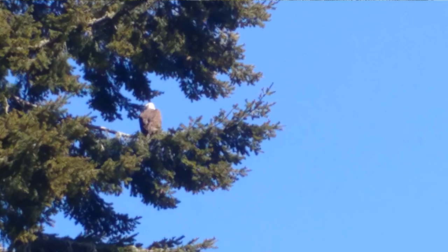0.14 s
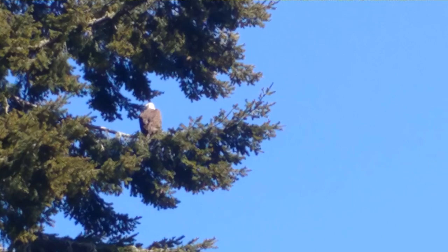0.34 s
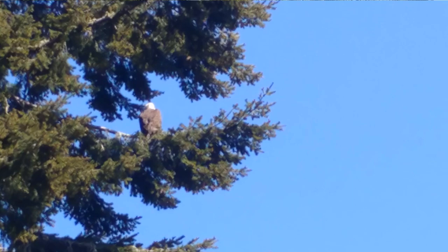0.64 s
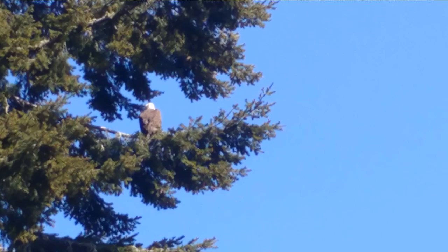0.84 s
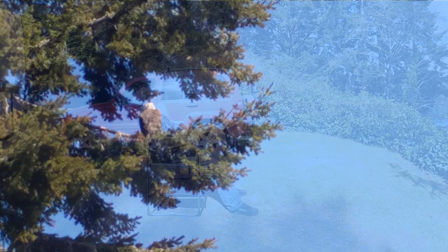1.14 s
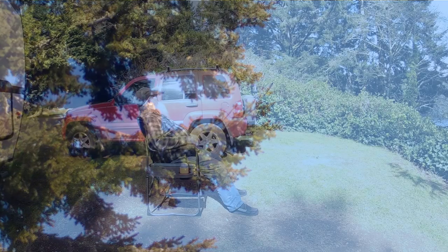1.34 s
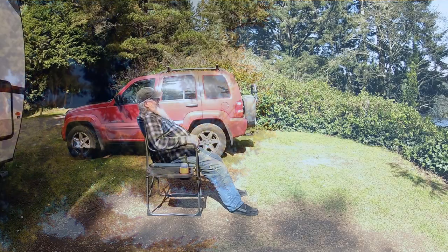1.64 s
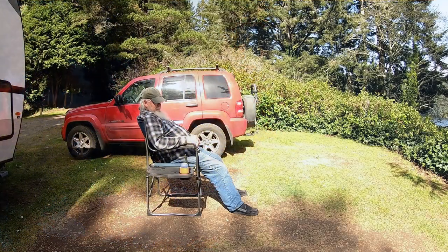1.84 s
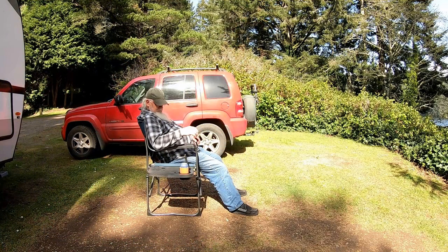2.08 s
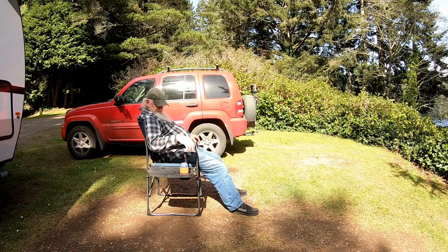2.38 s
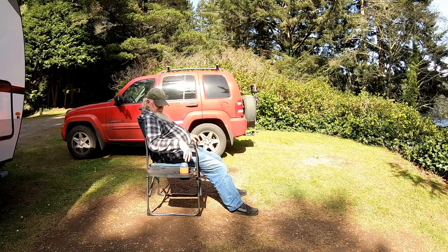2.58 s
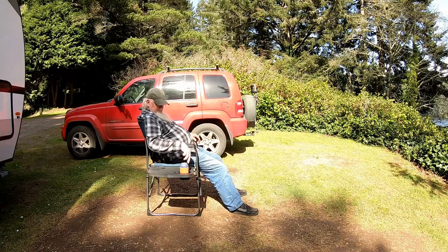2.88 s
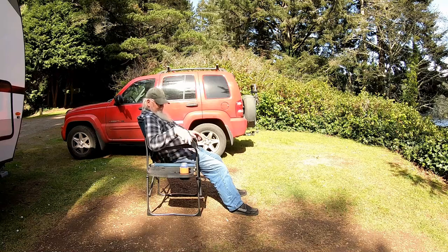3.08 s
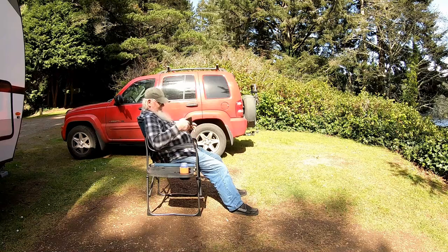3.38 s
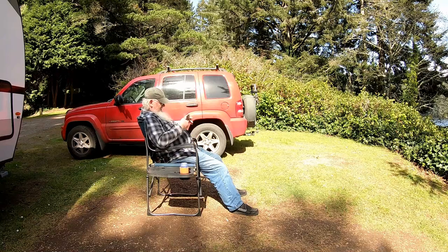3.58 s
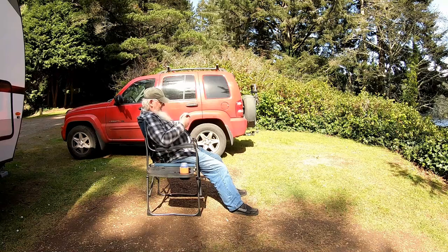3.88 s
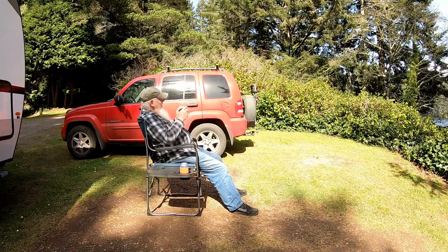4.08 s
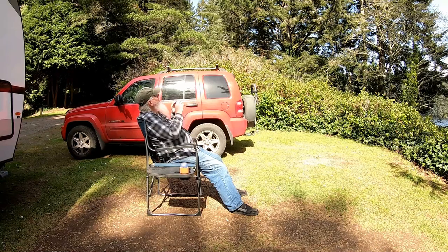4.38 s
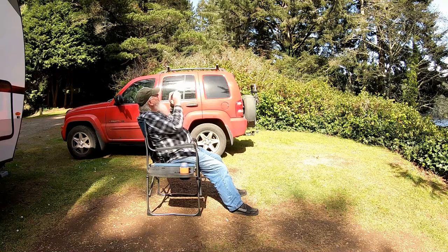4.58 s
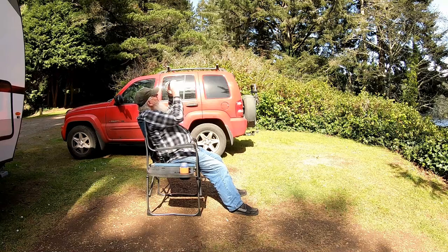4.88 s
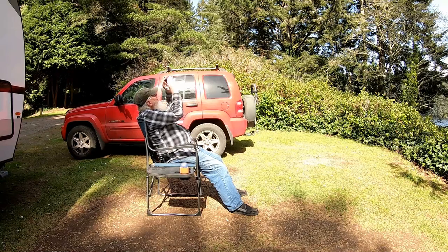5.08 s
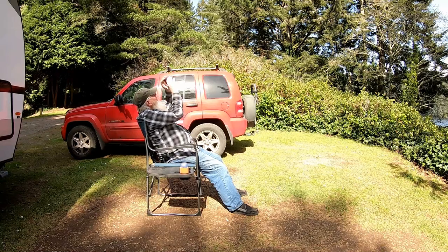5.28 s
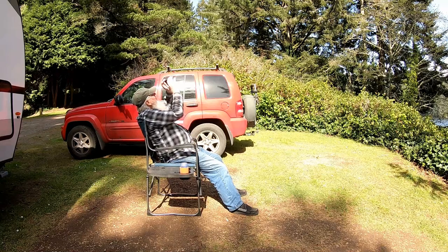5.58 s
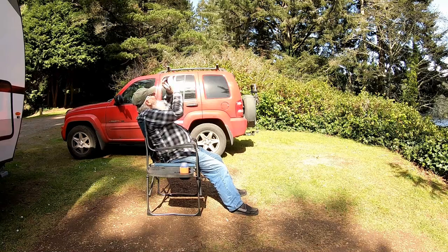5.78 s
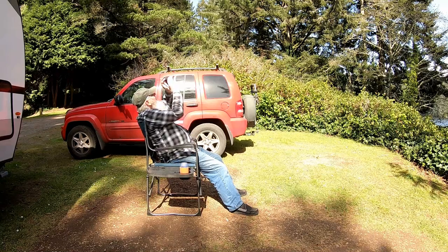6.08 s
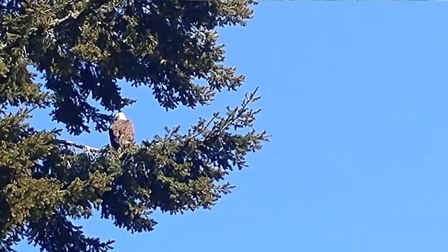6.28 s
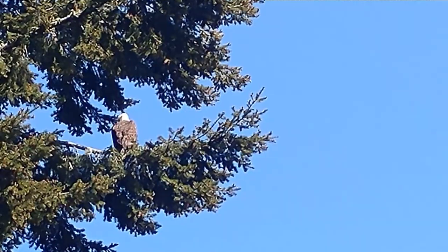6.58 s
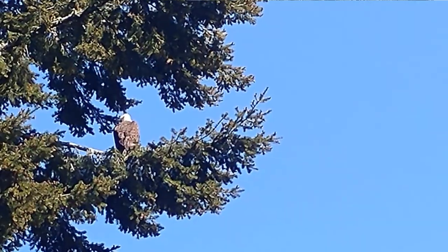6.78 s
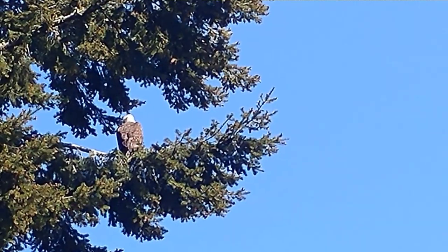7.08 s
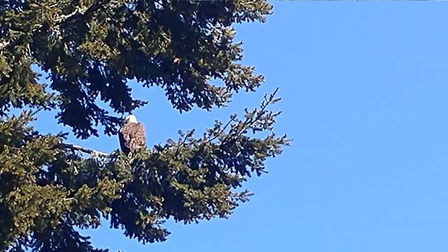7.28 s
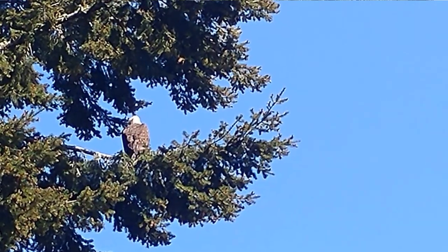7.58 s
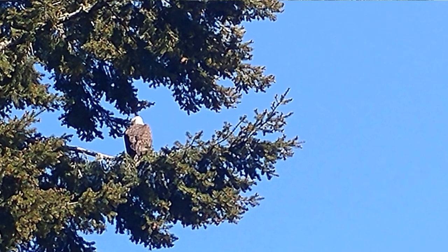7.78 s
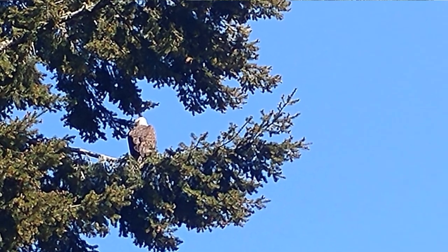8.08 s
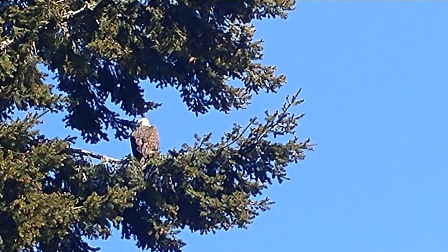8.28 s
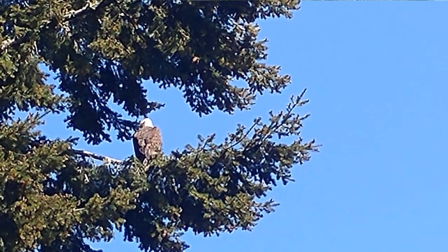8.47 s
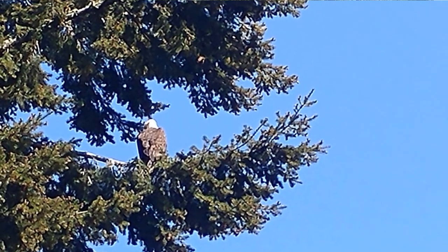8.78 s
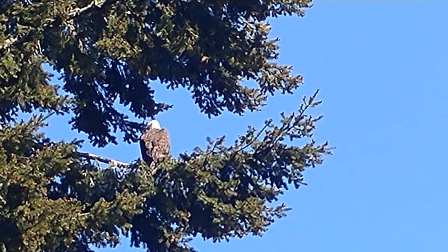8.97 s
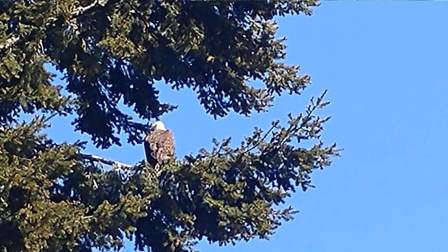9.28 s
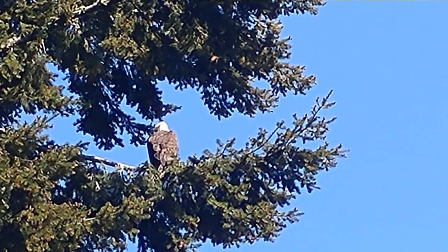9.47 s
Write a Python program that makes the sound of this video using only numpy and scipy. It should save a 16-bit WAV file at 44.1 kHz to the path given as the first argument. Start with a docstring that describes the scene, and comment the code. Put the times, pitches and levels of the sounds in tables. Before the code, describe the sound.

Outdoors among echoing firs, an eagle's quick high piping descends and stops; over soft distant rush, sharp yelp-and-pip calls follow near the end.

```python
"""By a lake, a bald eagle in a fir gives a falling run of piping notes, later yelps answered by pips.
Its notes are gliding sine tones with overtones, roughened by noise; noise bands make its breath.
Wheezy whistles are narrow noise bands, a small bird is swept sines, small clicks are ringing noise.
Trees throw the calls back as scattered echoes; behind lie a distant, slowly growing rush, a drone,
a gusty low rumble of air and a faint high hiss, all coloured noise."""
import sys
import numpy as np
from scipy import signal
from scipy.io import wavfile
from scipy.ndimage import uniform_filter1d

SR = 44100
rng = np.random.default_rng(int(sys.argv[2]) if len(sys.argv) > 2 else 0)


def inscribe(sig):
    """Save sig as 16-bit PCM at rate SR to the path in sys.argv[1].

    A 1-D sig is mono; a 2-D sig holds one channel per row.
    Samples are clipped to [-1, 1] before scaling.
    """
    pcm = np.round(np.clip(np.atleast_2d(sig).T, -1, 1) * 32767)
    wavfile.write(sys.argv[1], SR, pcm.astype(np.int16))


N = 425124  # length in samples

# Eagle tables: overtone levels are relative to the fundamental.
# the piping run: t/s, length/s, pitch f/Hz, level/dB, 2nd harmonic level/dB, 3rd harmonic level/dB,
# scoop up to the pitch [share of pitch], fade [share of length], roughness [0-1]
PIPES = [ (0.288, 0.099, 2712, -15.5, -24, -33, 0.06, 0.78, 0.08),
         (0.404, 0.07, 2791, -14.5, -22.5, -33, 0.03, 0.82, 0.26),
         (0.501, 0.054, 2768, -16.3, -21, -33, 0.04, 0.47, 0.18),
         (0.616, 0.046, 2715, -16, -20, -31, .1, 0.2, .15),
         (0.744, 0.051, 2704, -15, -20.5, -30.5, .09, 0.53, 0),
         (0.872, .043, 2643, -15.5, -20.5, -28.5, .08, 0.9, 0.06),
         (1, 0.047, 2596, -20, -20, -38, 0.09, 0.7, 0.28),
         (1.341, .033, 2398, -28.5, -29.5, -35, 0, 0.2, 0.54)]
# yelps: t/s, time stretch [1 = usual], level/dB, low stage level/dB, high stage level/dB
# (both stages relative to the middle one)
YELPS = [(8.112, 1.13, -25, -16, -33), (8.569, 1.08, -20.5, -7, -5.5), (9.024, .92, -20.5, -2, 1.5),
         (9.446, 1.09, -19, -3.5, -1)]
# pips after yelps: t/s, length/s, pitch f/Hz, level/dB, 2nd harmonic level/dB, preceding wheeze level/dB
PIPS = [(8.273, 0.019, 3057, -20, -25, -61.5), (8.711, .020, 3056, -17, -27.5, -57.5),
        (9.138, .016, 3057, -17.5, -32, -47.5)]
# hoarse falls that end calls: t/s, length/s, start f/Hz, end f/Hz, level/dB, roughness [0-1]
FALLS = [(0.542, 0.019, 2156, 1950, -39.5, .4), (8.293, 0.018, 3110, 2980, -27, 0.42),
         (8.729, 0.024, 2735, 1910, -30, 0.76), (9.154, .040, 3073, 1740, -34.5, 0.9),
         (9.523, 0.068, 2550, 1410, -35.5, 0.9)]
# a pipe tops out at this share of its length; the longer it is, the lower it ends
PIPE_PEAK, SAG_HZ_PER_S = 0.33, 3600


def gain_of(db):
    """Level to amplitude: 20 dB is a factor of ten."""
    return 10 ** (np.asarray(db) / 20)


def evened(x):
    """Power normalisation: scales to rms 1."""
    return x / np.sqrt(np.mean(x ** 2) + 1e-20)


def read(points, hz):
    """Interpolation on a logarithmic frequency axis."""
    f, value = np.transpose(points)
    return np.interp(np.log(hz + 1), np.log(f + 1), value)


def curve(rows):
    """Linear interpolation of a time table at every sample."""
    t, value = np.transpose(rows)
    return np.interp(np.arange(N) / SR, t, value)


def add(mix, s, sound):
    """Superposition: adds a sound into the mix from time s."""
    part = mix[max(round(s * SR), 0):][:len(sound)]
    part += sound[:len(part)]


def flutter(n, width_hz):
    """Band-limited complex noise of about rms 1; the bandwidth sets how fast it changes."""
    z = rng.standard_normal((SR // 2, 2)) @ [1, 1j]
    lowpass = signal.butter(3, width_hz / 2, fs=SR, output="sos")
    slow = signal.sosfilt(lowpass, z)
    unit = evened(slow.view(float)).view(complex) / np.sqrt(2)
    return unit[-n:]  # the end, where the filter has settled


def arch(u, start, top, end, place, bend=1.7):
    """Frequency glide along a power law: eases into its top and leaves it again."""
    place = np.clip(place, 0.05, 0.95)
    before = (start - top) * abs(1 - u / place) ** bend
    after = (end - top) * abs((u - place) / (1 - place)) ** bend
    return top + np.where(u < place, before, after)


def swell(u, rise, fade):
    """Amplitude envelope: rounded rise and fade, each a share of the length."""
    rise, fade = np.clip([rise, fade], 0.03, 0.9)
    opening = np.sin(np.pi / 2 * np.clip(u / rise, 0, 1))
    closing = np.sin(np.pi / 2 * np.clip((1 - u) / fade, 0, 1))
    return (opening * closing) ** 1.4


def hiss(length, start, top, end, place, width, db, rise=0.3, fade=0.23):
    """Heterodyning: slow complex noise on a gliding carrier is a narrow moving band of hiss."""
    u = np.linspace(0, 1, round(length * SR))
    carrier = np.exp(2j * np.pi * np.cumsum(arch(u, start, top, end, place)) / SR)
    band = (carrier * flutter(len(u), width)).real
    return gain_of(db) * evened(band) * swell(u, rise, fade)


def note(length, start, top, end, place, fade, db, second_db, third_db, rough,
         rise=0.0039, shimmer=0.56, catch=1.0, hump=0.062, grit=0.29):
    """Self-oscillation: the syrinx catches roughly, then whistles; returns fundamental and overtones."""
    # partials from the 3rd harmonic's neighbourhood up: multiple of the pitch, level/dB added to the 3rd's
    partials = [(2.5, -17.5), (3, 0.5), (3.5, -22.5), (4, -28), (4.5, -24), (5, -28)]
    t = np.arange(round(length * SR)) / SR
    u = t / length
    unrest = (rough + catch * np.exp(-t / 0.003)) * flutter(len(t), 600)
    pitch = arch(u, start, top, end, place) * (1 + 0.04 * unrest.real)
    phase = 2 * np.pi * np.cumsum(pitch) / SR
    force = swell(u, rise / length, max(fade, 0.3)) * (1 - hump * np.cos(np.pi * u ** 0.75) ** 2)
    upper = sum(gain_of(level) * np.sin(round(2 * k) / 2 * phase) for k, level in partials)
    # the overtones are grittier than the fundamental, and the upper ones weaken faster with force
    overtones = gain_of(second_db) * np.sin(2 * phase) + force ** 2 * gain_of(third_db) * upper
    overtones = overtones * (1 + grit * flutter(len(t), 600).real)
    envelope = np.sqrt(2) * gain_of(db) * force * (1 + shimmer * unrest.imag)
    return envelope * np.array([np.sin(phase), overtones])


def pipes():
    """Frequency modulation: each pipe scoops up and sags; lower ones start with a crack at a lower pitch."""
    crack_below_hz, crack_hz, crack_scoop = 2710, 1958, 0.059  # scoop as a share of the pitch
    crack_s, crack_lead_s, crack_db = 0.012, 0.0033, -29.5
    for s, length, hz, db, second_db, third_db, scoop, fade, rough in PIPES:
        end = hz - SAG_HZ_PER_S * length
        yield s, note(length, hz * (1 - scoop), hz, end, PIPE_PEAK, fade, db, second_db, third_db, rough)
        if hz < crack_below_hz:
            crack = note(crack_s, crack_hz * (1 - crack_scoop), crack_hz, crack_hz, place=0.65, fade=1.0,
                         db=crack_db, second_db=-29, third_db=-37, rough=0.33)
            yield s - crack_lead_s, crack


def yelps():
    """Fast upward glide: each yelp sweeps up, built from three overlapping stages (low, middle, high)."""
    # stages, low to high: delay t/s, length/s (both before the stretch), pitch f/Hz,
    # glide either side [share of pitch], 2nd harmonic level/dB, 3rd harmonic level/dB
    stages = [(0, 0.019, 1509, 0.09, -10.5, -28), (.005, .020, 1878, 0.08, -22, -41.5),
              (.013, .025, 2500, .06, -33.5, -49.5)]
    for s, stretch, db, low_db, high_db in YELPS:
        for stage, stage_db in zip(stages, (low_db, 0, high_db)):
            delay, length, hz, glide, second_db, third_db = stage
            yield s + delay * stretch, note(length * stretch, hz * (1 - glide), hz, hz * (1 + glide), 0.41,
                                            0.52, db + stage_db, second_db, third_db, rough=0.28)


def pips():
    """Near-pure tones: short high notes that droop a little."""
    droop = 0.018  # share of the pitch, either side
    for s, length, hz, db, second_db, _ in PIPS:
        yield s, note(length, hz * (1 + droop), hz, hz * (1 - droop), 0.46, 0.23, db, second_db,
                      third_db=-54.5, rough=0.19, rise=0.0058)


def falls():
    """Relaxing oscillation: the voice holds briefly, then slides down hoarsely."""
    for s, length, start, end, db, rough in FALLS:
        yield s, note(length, start, start, end, 0.37, 0.67, db, second_db=-27, third_db=-47.5, rough=rough)


def eagle():
    """Source separation: fundamentals with the breath of the falls, and overtones with other hiss."""
    whistle, overtones = np.zeros((2, N))
    for s, (low, high) in [*pipes(), *yelps(), *pips(), *falls()]:
        add(whistle, s, low)
        add(overtones, s, high)
    # a grainy band around each pipe's 2nd harmonic
    for s, length, hz, db, *_ in PIPES:
        end = hz - SAG_HZ_PER_S * length
        add(overtones, s, hiss(length, 2 * end, 2 * hz, 2 * end, PIPE_PEAK, width=320, db=db - 36.5))
    # air that escapes with a yelp
    air_hz = 2286
    for s, _, db, *_ in YELPS:
        add(overtones, s, hiss(0.035, air_hz, air_hz, air_hz, 0.5, width=1400, db=db - 23))
    # the breathy part of a fall
    for s, length, start, end, db, _ in FALLS:
        add(whistle, s, hiss(length, start, start, end, 0.51, width=680, db=db - 4))
    return whistle, overtones


def wheezes():
    """Band-limited noise: a short falling wheeze just before each pip and each pipe but the first."""
    # a pipe's wheeze follows its pitch steeply: pipe_wheeze_hz before a pipe of reference_hz
    reference_hz, pipe_wheeze_hz, power = 2730, 5200, 6.6
    pipe_lead_s, pipe_under_db = 0.012, -34.5
    pip_lead_s, pip_wheeze_hz = 0.016, 5640
    length_s, fall, width_hz = 0.017, 0.048, 1100  # fall: share of the pitch, either side
    starts = []
    for s, _, hz, db, *_ in PIPES[1:]:
        wheeze_hz = pipe_wheeze_hz * (hz / reference_hz) ** power
        starts.append((s - pipe_lead_s, wheeze_hz, db + pipe_under_db))
    for s, *_, db in PIPS:
        starts.append((s - pip_lead_s, pip_wheeze_hz, db))
    out = np.zeros(N)
    for s, hz, db in starts:
        add(out, s, hiss(length_s, hz * (1 + fall), hz, hz * (1 - fall), 0.3, width_hz, db))
    return out


def whistles():
    """Interaural level difference: airy whistles, mostly to the right, and falling rasps by the first two."""
    # thin whistles: t/s, length/s, start f/Hz, top f/Hz, end f/Hz, level/dB, left minus right level/dB
    airy = [(5.586, 0.2, 3650, 6790, 6980, -55.5, -11), (5.846, 0.098, 3700, 6020, 4600, -51, -13.5),
            (8.658, .016, 4300, 5825, 5950, -55, 1)]
    # low rasps: t/s, length/s, start pitch f/Hz, level/dB, 2nd harmonic level/dB (relative)
    rasps = [(5.717, 0.063, 2460, -56, 3), (5.896, 0.056, 2595, -53, -8), (6.039, .056, 2655, -57.5, -25)]
    rasp_fall, rasp_width_hz, rasp_pan_db, fourth_db = 0.2, 560, -6, -18  # fourth: beside the 2nd harmonic
    air_hz, air_width_hz, air_db = 4000, 3300, -3  # broad hiss around each rasp
    sounds = []
    for s, length, start, top, end, db, pan_db in airy:
        sounds.append((s, pan_db, hiss(length, start, top, end, 0.59, 830, db)))
    for s, length, hz, db, second_db in rasps:
        for k, part_db in ((1, 0), (2, second_db), (4, second_db + fourth_db)):
            part = hiss(length, k * hz, k * hz, k * hz * (1 - rasp_fall), 0.38,
                        rasp_width_hz * np.sqrt(k), db + part_db)
            sounds.append((s, rasp_pan_db, part))
        rasp_air = hiss(length, air_hz, air_hz, air_hz * (1 - rasp_fall), 0.45, air_width_hz, db + air_db)
        sounds.append((s, rasp_pan_db, rasp_air))
    left, right = np.zeros((2, N))
    for s, pan_db, sound in sounds:
        add(left, s, gain_of(pan_db / 2) * sound)
        add(right, s, gain_of(-pan_db / 2) * sound)
    return np.array([left, right])


def small_bird():
    """Linear chirps: a small bird's quick, clean downward sweeps."""
    # falling ticks: t/s, length/s, start f/Hz, end f/Hz, peak level/dB
    ticks = [(0.118, 0.026, 6300, 5200, -67), (1.187, 0.011, 5200, 3900, -58),
             (1.21, .010, 4950, 3800, -60), (1.22, 0.0058, 4900, 3580, -51), (7.651, .016, 7600, 5850, -66),
             (7.697, 0.035, 8400, 6200, -66)]
    out = np.zeros(N)
    for s, length, start, end, db in ticks:
        u = np.linspace(0, 1, round(length * SR))
        phase = 2 * np.pi * np.cumsum(start + (end - start) * u) / SR
        add(out, s, gain_of(db) * np.sin(np.pi * u) * np.sin(phase))
    return out


def clicks(snap=4, after_db=-21, after_t60=0.33):
    """Impulse response: a snap and crackle ring a dull body and die away; most keep only treble. At 7.33 s a
    longer burst of high hiss sounds as well."""
    # small clicks; at 7.33 s a longer burst of high hiss:
    # t/s, level/dB (rms of the first 10 ms), 60 dB decay/s, low edge f/Hz
    click_table = [(1.991, -51, 0.012, 3430), (2.106, -63.5, 0.013, 3500), (2.891, -68, 0.011, 4000),
                   (3.208, -33, 0.036, 203), (3.464, -74, 0.014, 6000), (5.426, -58, .02, 3500),
                   (6.265, -56, 0.0056, 2940), (7.331, -63, .18, 5900)]
    # body resonance: f/Hz, level/dB
    colour = [(100, 1), (400, 7), (700, 8), (1100, -6.5), (1550, 17.5), (1850, -1), (2150, 8), (2900, -3),
              (3400, -5.5), (5200, -4), (7500, -18.5), (11200, -20), (12200, -55)]
    out, t = np.zeros(N), np.arange(SR // 4) / SR
    log_gain = np.log(gain_of(read(colour, abs(np.fft.fftfreq(len(t), 1 / SR)))))
    # minimum phase: the body rings only after it is struck
    body = np.fft.ifft(np.exp(signal.hilbert(log_gain).conj())).real
    for s, db, t60, low_hz in click_table:
        decay = gain_of(-60 * t / t60) + gain_of(after_db - 60 * t / after_t60)
        strike = snap * (t == 0) + rng.standard_normal(len(t)) * decay
        ringing = signal.fftconvolve(strike, body)[:len(t)]
        crack = signal.sosfilt(signal.butter(2, low_hz, "high", fs=SR, output="sos"), ringing)
        add(out, s, gain_of(db) * crack / np.sqrt(np.mean(crack[:SR // 100] ** 2)))
    return out


def woods(x, near_db=-15, near_t60=0.083, far_db=-14, first=0.012, build=0.013, likeness=0.99, treble_db=3):
    """Multiple scattering: near trunks give a short echo, far trees a longer tail that builds up."""
    # 60 dB decay of the far trees: f/Hz, decay/s
    far_t60 = [(500, 0.94), (2700, 0.56), (5500, 0.31), (8000, 0.34), (14000, 0.087)]
    t = np.arange(SR) / SR
    # sparse random reflections, about 2500 per second, from `first` seconds on
    taps = rng.standard_normal((2, SR)) * (rng.random(SR) < 2500 / SR) * (t > first)
    likeness = np.clip(likeness, 0, 1)
    taps[1] = likeness * taps[0] + np.sqrt(1 - likeness ** 2) * taps[1]
    near = taps * gain_of(-60 * t / near_t60)
    # reversing the taps gives the far trees a different pattern
    building = taps[:, ::-1] * np.clip((t - first) / build, 0, 1)
    hz, when, z = signal.stft(building, SR, nperseg=256)
    treble_lift = treble_db * np.clip(hz / 2700 - 1, 0, 1)[:, None]
    z = z * gain_of(treble_lift - 60 * when / read(far_t60, hz)[:, None])
    far = signal.istft(z, SR, nperseg=256)[1][:, :SR]
    near_echo = gain_of(near_db) * near / np.linalg.norm(near[0])
    far_echo = gain_of(far_db) * far / np.linalg.norm(far[0])
    return signal.fftconvolve(x[None], near_echo + far_echo, axes=1)[:, :N]


def bump():
    """Narrow-band noise: a brief, dull puff of low sound."""
    # t/s, length/s, centre f/Hz, bandwidth f/Hz, level/dB
    puff = (3.74, .11, 250, 150, -50)
    s, length, hz, width, db = puff
    out, t = np.zeros(N), np.arange(round(length * SR)) / SR
    band = (np.exp(2j * np.pi * hz * t) * flutter(len(t), width)).real
    add(out, s, gain_of(db) * evened(band) * swell(t / length, 0.31, 0.61))
    return out


def air(spectrum, patchy_db):
    """Partial coherence: coloured two-channel noise of rms 1 with slowly drifting patches."""
    # left-right likeness: f/Hz, correlation [-1 to 1]
    same_table = [(60, 1), (110, 0.97), (200, 0.96), (380, 0.91), (700, 0.62), (1290, 0.47), (2380, 0.48),
                  (4400, 0.53), (8120, -0.27), (15000, -0.17)]
    # balance: f/Hz, left minus right level/dB
    lean_table = [(60, 2), (130, -0.5), (290, 1.5), (640, -0.5), (1410, -2.5), (3100, 0.5), (6820, -5.5),
                  (15000, -2)]
    hz = np.fft.rfftfreq(4096, 1 / SR)
    a, b, c, d, patches = rng.standard_normal((N // 1024 + 5, len(hz), 5)).T
    patches = uniform_filter1d(patches, size=30, axis=0)  # over frequency
    patches = evened(uniform_filter1d(patches, size=5, axis=1))  # over time
    same = np.clip(read(same_table, hz), -1, 1)[:, None]
    lean = gain_of(read(lean_table, hz) / 2)[:, None]
    left = a + 1j * b
    right = same * left + np.sqrt(1 - same ** 2) * (c + 1j * d)
    z = np.array([left * lean, right / lean])
    z *= gain_of(read(spectrum, hz)[:, None] + patchy_db * patches)
    return evened(signal.istft(z, nperseg=4096, noverlap=3072)[1][:, :N])


def outdoors():
    """Incoherent sum: a distant rush, a low drone, a gusty rumble and a faint high hiss."""
    # spectra: f/Hz, relative level/dB per Hz
    rush_colour, drone_colour = [(150, -37.5), (250, -8), (297, -9), (324, -8.5), (420, -10.5), (624, -5.5),
                                 (729, -0.5), (944, 1), (2400, -18), (3820, -32), (5780, -34.5),
                                 (7750, -44), (9530, -40), (11900, -62.5), (15400, -64.5)], [(20, -28.5), (90, -17.5), (130, -6), (160, 2.5), (178, -4.5),
                                               (198, 5.5), (220, -3.5), (300, -14), (450, -26.5),
                                               (900, -74.5)]
    rumble_colour, fizz_colour = [(10, -7.5), (30, -6.5), (55, -0.5), (95, 2), (125, -1.5), (200, -20),
                                  (500, -64.5)], [(1500, -18.5), (3400, 4), (4500, -8.5), (7000, -7),
                                                  (10000, -14.5), (15000, -21)]
    # levels over time: t/s, level/dB (the rumble's without gusts)
    rumble_level, drone_level, fizz_level = [(0, -55), (1.85, -54.5), (2, -68), (5, -67.5), (5.6, -58.5),
                                             (6.85, -66), (7.6, -52.5), (9.64, -55)], [(0, -58), (2, -57), (5.8, -58), (6.3, -57),
                                                                (8, -54), (9.64, -58)], [(0, -71.5), (1, -69.5),
                                                                                     (1.9, -87),
                                                                                     (7.2, -108),
                                                                                     (7.4, -74.5),
                                                                                     (9.64, -76)]
    # soft gusts that lift the rumble: centre t/s, peak level/dB
    gust_table = [(2.41, -57.5), (2.68, -61.5), (3.3, -58), (3.78, -57.5), (4.48, -56), (5.52, -60),
                  (6.08, -52), (7.2, -53)]
    gust_s = 0.072  # from the peak to 1/e
    rush_db, rush_rise_db_per_s = -48, 0.1943  # level at mid-length, and its slow growth
    t = np.arange(N) / SR
    rush = air(rush_colour, patchy_db=1.0) * gain_of(rush_db + rush_rise_db_per_s * (t - t.mean()))
    gusts = sum(gain_of(db) * np.exp(-((t - s) / gust_s) ** 2) for s, db in gust_table)
    # powers add
    rumble = air(rumble_colour, patchy_db=0.5) * np.hypot(gain_of(curve(rumble_level)), gusts)
    drone = air(drone_colour, patchy_db=1.2) * gain_of(curve(drone_level))
    fizz = air(fizz_colour, patchy_db=-4.0) * gain_of(curve(fizz_level))
    return rush + rumble + drone + fizz


def scene(direct_db=-2.16, overtone_direct_db=-2, overtone_wet_db=5, thin_wet_db=2, click_wet_db=-12):
    """Directivity: the eagle, a little right, beams overtones away; trees return them wider."""
    # how much of the eagle's voice reaches the trees: t/s, level/dB
    echo_level = [(0, 2.5), (1.5, -5.5), (8, -2.5), (9.64, -4)]
    whistle, overtones = eagle()
    thin, snaps = whistles() + wheezes() + small_bird(), clicks()
    reach = gain_of(curve(echo_level))
    treble = reach * gain_of(overtone_wet_db) * overtones
    treble = treble + gain_of(thin_wet_db) * thin.mean(0) + gain_of(click_wet_db) * snaps
    echo = woods(reach * whistle) + woods(treble, near_db=-13.5, far_db=-11.5, likeness=0.92)
    calls = gain_of(direct_db) * whistle + gain_of(overtone_direct_db) * overtones + echo
    return calls * gain_of([[-0.75], [0.75]]) + thin + snaps + bump() + outdoors()


def record(dry):
    """Band limitation: a linear-phase low-pass removes the extreme treble."""
    edge_hz = 15650
    lowpass = signal.firwin(511, edge_hz, window=("kaiser", 9), fs=SR)
    return signal.oaconvolve(dry, lowpass[None], "same")


dry = scene()
out = record(dry)
inscribe(out)
```